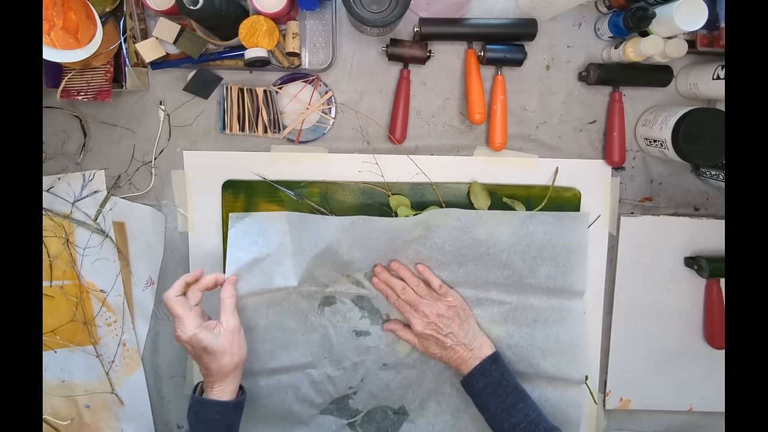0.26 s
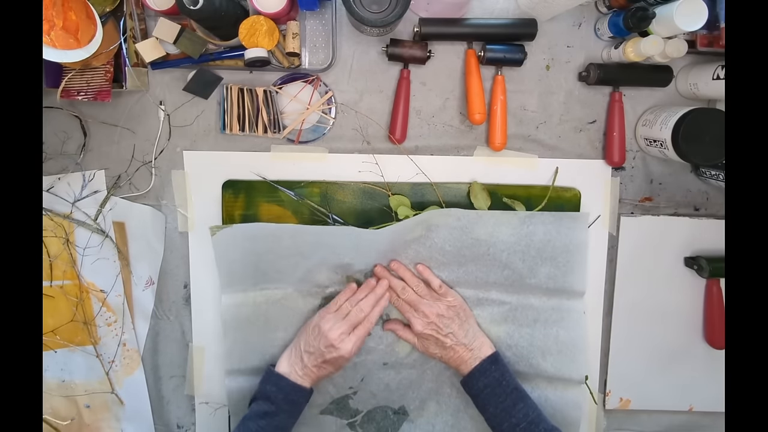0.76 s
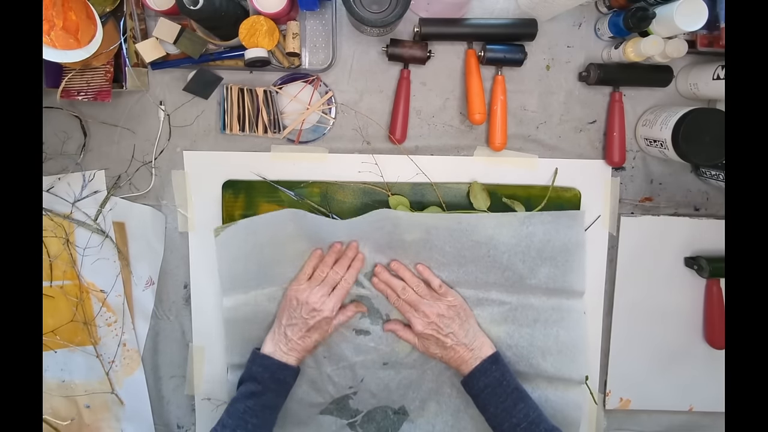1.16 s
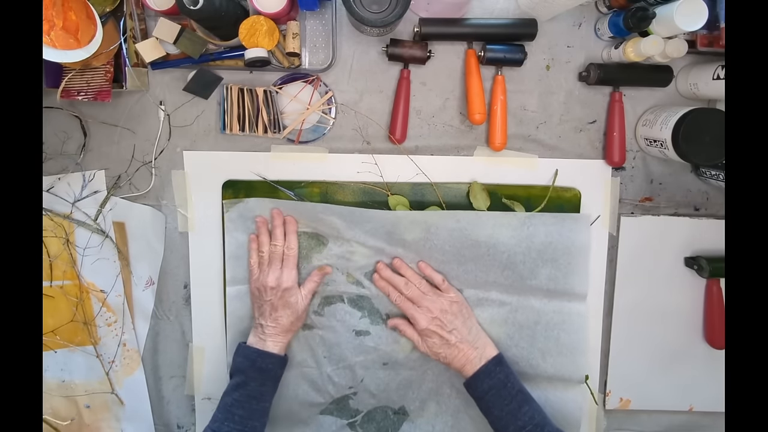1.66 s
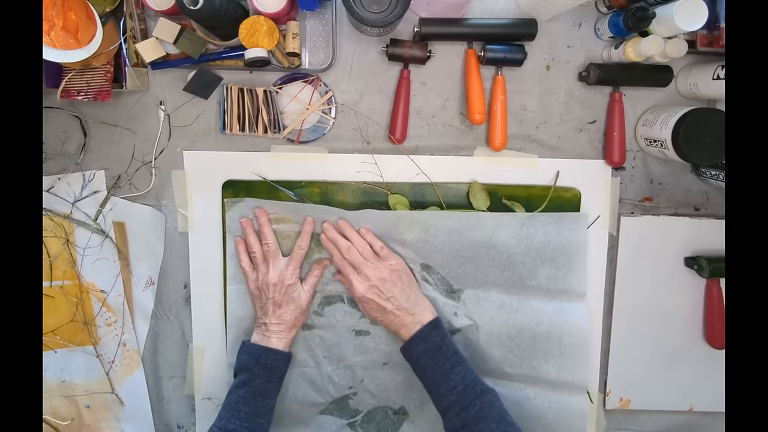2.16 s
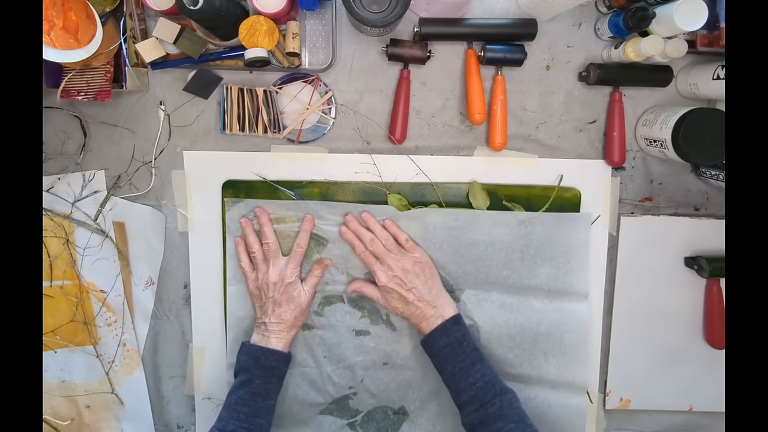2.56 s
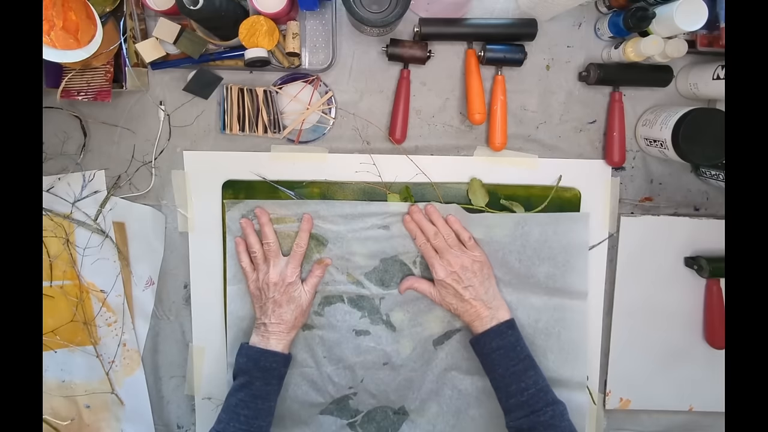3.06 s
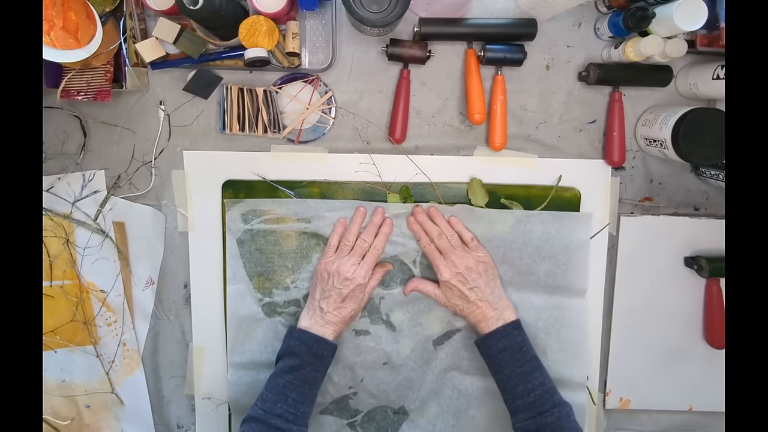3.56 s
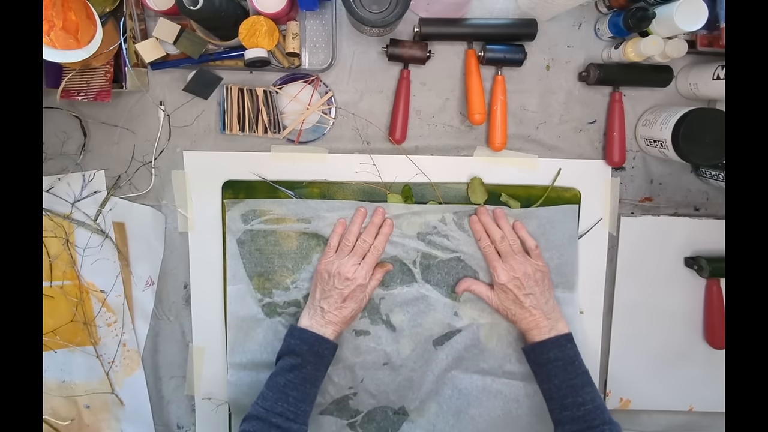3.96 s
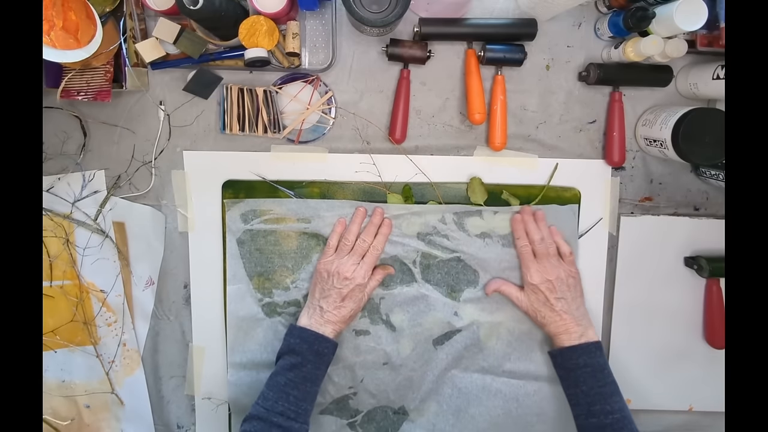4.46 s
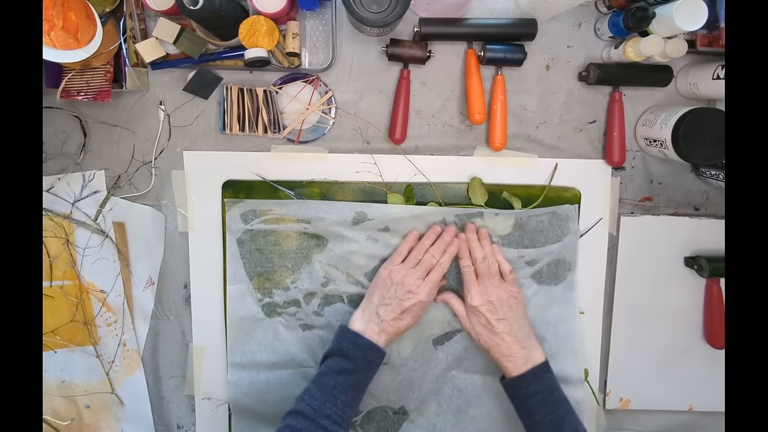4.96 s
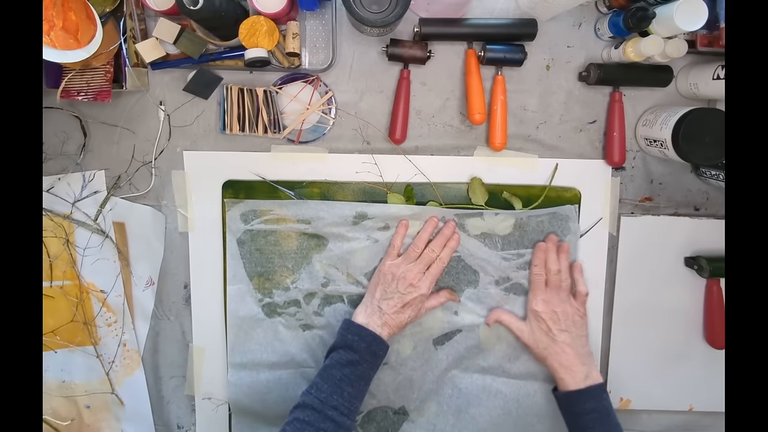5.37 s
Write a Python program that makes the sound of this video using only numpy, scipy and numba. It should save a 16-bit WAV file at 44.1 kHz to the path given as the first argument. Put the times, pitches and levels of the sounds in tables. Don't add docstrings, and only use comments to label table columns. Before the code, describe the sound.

Hands smooth thin tissue paper over a plate on a table, with crisp irregular rustling strokes, sharp crinkling snaps and a quiet room behind.

```python
import sys
import numpy as np
from scipy import signal
from scipy.fft import rfft, irfft
from scipy.io import wavfile
from scipy.ndimage import uniform_filter1d, minimum_filter1d
from numba import njit

SR = 44100
rng = np.random.default_rng(int(sys.argv[2]) if len(sys.argv) > 2 else 0)


def level_to_linear(level):
    exponent = np.asarray(level, float) / 20
    return 10 ** exponent


def pcm_store(signal):
    levels = np.round(np.clip(np.atleast_2d(signal), -1, 1) * 32767)
    wavfile.write(sys.argv[1], SR, levels.astype(np.int16).T)


N = 247842

# start in seconds, length in seconds, rustle at the start in dB,
# rustle at the end in dB, tautness in dB.
STROKES = [(.11, .05, -59, -47.5, -5), (.165, 0.048, -42, -33, -6), (0.247, 0.22, -44.5, -59, -7),
           (.855, .065, -62, -42, -2), (0.432, 0.18, -42, -46, -4), (0.906, .415, -42.5, -34, -2),
           (1.352, 0.48, -44.5, -43.5, 1), (1.842, 0.16, -47, -40, -4), (3.47, 0.045, -55, -55, -4),
           (2.207, 0.065, -37.5, -42, -1), (2.282, 0.059, -45.5, -39.5, -2), (2.35, 0.28, -38.5, -45, 0),
           (2.613, 0.5, -37.5, -36.5, 0), (3.138, 0.19, -43.5, -52, -1), (3.645, 0.214, -39.5, -35, -0.5),
           (3.874, 0.18, -40.5, -40, 0.5), (4.274, 0.21, -50.5, -41.5, 1), (4.426, 0.3, -38.5, -46, 1),
           (4.73, 0.11, -41.5, -38, 0), (4.905, 0.018, -37.5, -34.5, -1.5), (5.069, .18, -39, -37.5, 0),
           (5.22, .2, -38.5, -41, 0), (5.375, 0.097, -35, -39, -1)]
# time in seconds, rustle in dB, time to fade 10 dB in ms,
# tautness in dB.
CRUMPLES = [(.44, -40.5, 34, -2), (0.502, -31, 16, -1.5), (.585, -32.5, 0, 3.5), (0.932, -35.5, 29, -4.5),
            (4.19, -40.5, 24, -3), (4.53, -36.5, 73, 2), (4.925, -40, 15, 6), (1.048, -31, 36, -2),
            (1.2, -31, 36, -4), (1.281, -33.5, 130, -0.5), (1.44, -35, 57, 0), (2.207, -30, 9, -1.5),
            (2.41, -36, 66, -0.5), (2.69, -31.5, 63, -4), (3.66, -38, 63, -6), (3.85, -36.5, 56, 4),
            (3.961, -31.5, 14, -1.5), (4.818, -38.5, 34, -1), (4.993, -44, 5, 2.5), (5.51, -43, 25, -3),
            (1.95, -36, 11, 0), (2.27, -35.5, 15, -3), (5.563, -50, 8, -2),(5.46, -43, 34, 0)]
# start in seconds, rustle in dB, fall in dB per second.
SETTLES = [(0.032, -54.5, 157), (.6, -45.5, 254), (0.72, -58, 200), (0.86, -57.5, 90), (2.03, -53, 72),
           (3.32, -61.5, 84), (3.37, -48, 500), (4.085, -45, 300), (4.94, -52, 600), (4.86, -60, 200),
           (4.13, -58, 100), (0.218, -37.5, 310), (3.517, -37.5, 114), (4.18, -41.5, 120), (5.47, -38, 230)]
# frequency in Hz, gain in dB.
SHEET_COLOUR = [(200, -25), (450, -21), (900, -8.5), (1600, -7.5), (2100, -7), (2700, -1), (4200, -5.5),
                (5500, -4), (7400, -1), (9000, 2.5), (10000, -4), (11800, 7), (13300, 4), (15600, 3)]
# time in seconds, peak in dB, centre in Hz, avalanche length in ms.
SNAPS = [(.2114, -17, 13800, 1.0), (.4971, -13, 9300, .54), (.5034, -13, 12800, 1.9),
         (1.0448, -16, 8650, 1.9), (1.1799, -12.5, 14600, .9), (1.1997, -12, 12300, .54),
         (1.2232, -15, 3600, .8), (1.6837, -17, 13900, .6), (1.899, -19, 14200, .7),
         (1.9605, -15, 13000, .54), (1.9848, -25.5, 8060, 2.4), (2.2044, -23, 10000, 1.6),
         (2.3157, -12, 12200, .53), (2.3338, -15, 12000, .67), (2.6663, -18, 14100, .94),
         (2.6859, -9, 13760, .35), (2.6956, -28, 9200, 1.3), (2.7118, -2.5, 13800, .41),
         (2.7819, -11.5, 14050, 1.0), (2.8109, -3, 12500, .46), (2.9271, -13, 12200, .35),
         (2.9578, -11, 12900, .63), (3.07, -21, 13900, .33), (3.7858, -16, 11700, 1.0),
         (3.8532, -7, 11400, .39), (4.6691, -21.5, 8400, .41), (4.7416, -19.5, 8900, .54),
         (4.7793, -19.5, 4200, .67), (4.9015, -23, 8200, 1.4), (5.4591, -22.5, 3480, 2.1)]
# time in seconds, peak in dB, centre in Hz.
CRACKS = [(0.9323, -23, 10000), (1.0989, -28, 12700), (1.1303, -17, 10200), (1.2343, -17, 9000),
          (1.3263, -18, 8400), (1.3946, -17, 14200), (1.4352, -28, 13900), (1.9262, -24.5, 3600),
          (2.1993, -22, 11800), (2.2528, -20, 11800), (2.4003, -17.5, 7700), (2.4516, -14.5, 13500),
          (2.4823, -12.5, 11000), (2.5378, -22, 11300), (2.64, -17, 13800), (2.7296, -17, 12900),
          (2.7544, -17, 13200), (2.8547, -19, 7900), (3.0364, -13, 11400), (3.1088, -17, 15300),
          (3.521, -19.5, 8100), (3.6211, -21.5, 12400), (3.7055, -16.5, 12700), (4.0669, -20, 12500),
          (4.076, -20.5, 7900), (4.189, -31, 11100), (4.2245, -29, 7000), (4.9205, -27, 14600),
          (5.1176, -22, 8700), (5.279, -21, 13300)]
# time in seconds, peak in dB, centre in Hz.
TICKS = [(0.04, -37, 7860), (0.318, -23.5, 13900), (.3419, -33, 7500), (.4709, -23, 9450),
         (0.5577, -27, 9100), (0.6757, -26.5, 7140), (.727, -36.5, 2800), (0.804, -38.5, 7200),
         (0.8173, -24.5, 8800), (1.5928, -21.5, 8200), (1.7393, -22.5, 14000), (1.8626, -26, 6900),
         (2.0067, -22.5, 3280), (2.1434, -28, 9600), (2.1741, -43, 7500), (3.2, -27.5, 7800),
         (3.2618, -22.5, 8000), (3.2959, -22.5, 9050), (3.3735, -33, 8100), (3.4724, -35, 11300),
         (3.491, -29.5, 12300), (3.5682, -24, 9300), (3.5816, -22, 8100), (4.1159, -22, 13300),
         (4.1498, -28, 13700), (4.3213, -27, 13300), (4.88, -41, 7900), (4.956, -27, 9000),
         (4.9883, -31, 12500), (5.5608, -31.5, 7600)]
# time in seconds, peak in dB.
PATS = [(0.202, -48.5), (1.238, -44), (1.551, -54), (1.983, -48.5), (2.692, -44.5), (2.807, -41),
        (2.871, -50), (2.946, -53), (3.761, -59), (3.961, -48), (4.419, -65), (4.565, -53), (4.895, -52),
        (5.073, -53)]
# time in seconds, frequency in Hz, level in dB, half length in seconds.
TABLE_BOOMS = [(4.702, 145, -51.5, 0.033)]
# frequency in Hz, density in dB per Hz.
STUDIO_COLOUR = [(21, -21), (36, 2), (116, -1.5), (175, -13), (225, -22), (400, -19), (640, -27.5),
                 (900, -14), (1300, -14), (2500, -14), (5600, -25), (9000, -52), (10300, -35), (15000, -29)]
# time in seconds, level in dB, half length in seconds.
SWELLS = [
    (0.0, -68, .1),
    (1.253, -58, 0.13),
    (3.226, -61, 0.27),
    (3.572, -64, .06),
    (3.8, -63, .06),
    (4.96, -61, 0.029),
    (5.42, -63, .13),
]
# frequency in Hz, level in dB.
HUM = [(59.5, -73), (120, -72.5)]

ATTACK_DB_PER_S, RELEASE_DB_PER_S, STILL_DB = 1300, 1100, -74
USUAL_DB = -40
# dB at the usual rustle, dB per dB of rustle, dB per dB of tautness.
BODY_LAW, CRISP_LAW = (-12.5, -0.31, -0.23), (-3.5, 0.23, 2)
LIGHT_CLUMP, LIGHT_SKIN, LIGHT_FOLD = 0.15, 0.44, 0.15
FOLD_OVER_DB, FOLD_SCATTER_DB, FOLD_MS = 13.5, 4.5, 0.75
FOLD_LOW_HZ, FOLD_HIGH_HZ = 7000, 14200
TICK_MS = 0.75
ECHO_S, ECHO_SHARE = 20 / SR, 0.3
STUDIO_DB, HISS_DB = -60, -80
RUMBLE_DB, RUMBLE_WANDER_DB = -74.5, 2.5
TOP_HZ, PEAK_TOP_HZ, TOP_GATE_DB = 15800, 16900, -34


def hands():
    t = np.arange(N) / SR

    def rise(s):
        return ATTACK_DB_PER_S * np.maximum(s - t, 0)

    moves = [(STILL_DB + 0 * t, 0)]
    for s, length, start_db, end_db, taut in STROKES:
        slide_db = np.interp(t, [s, s + length], [start_db, end_db])
        release = RELEASE_DB_PER_S * np.maximum(t - s - length, 0)
        moves.append((slide_db - rise(s) - release, taut))
    with np.errstate(divide="ignore", invalid="ignore"):
        for s, db, fade_ms, taut in CRUMPLES:
            moves.append((db - 10 * np.abs(t - s) / (fade_ms / 1000), taut) if fade_ms else (STILL_DB + 0 * t, 0))
    for s, db, fall in SETTLES:
        moves.append((db - rise(s) - fall * np.maximum(t - s, 0), 0))
    levels = np.array([db for db, _ in moves])
    taut_db = np.array([taut for _, taut in moves], float)[levels.argmax(axis=0)]
    return levels.max(axis=0), uniform_filter1d(taut_db, size=600)


def paper(stroke_db, taut_db):
    body_db, crisp_db = (db + slope * (stroke_db - USUAL_DB) + pull * taut_db
                         for db, slope, pull in (BODY_LAW, CRISP_LAW))
    light_db = USUAL_DB - stroke_db
    clump_db = np.clip(2.73 + LIGHT_CLUMP * light_db, 0.5, 5)
    crinkle = rustle(count=14000, size=6, scatter_db=4.0, length_ms=0.5, ring_ms=0.25, clump_db=clump_db)
    skin = level_to_linear(-2.0 - LIGHT_SKIN * light_db) * band(rng.standard_normal(N), 90, 14700)
    body, middle, crisp = split(colour(crinkle + skin, SHEET_COLOUR), low_hz=1900, high_hz=8380)
    sheet = middle + level_to_linear(body_db + 12.5) * body + level_to_linear(crisp_db - 1.1) * crisp
    return level_to_linear(stroke_db - 3.5) * sheet / np.std(middle)


def rustle(count, size, scatter_db, length_ms, ring_ms, clump_db):
    when, luck, centre = rng.random((count, 3)).T[:, :, None]
    late, pitch, turn = np.moveaxis(rng.random((count, size, 3)), 2, 0)
    start = (when * N - np.log(1 - late) * length_ms / 1000 * SR).astype(np.int64)
    hz = 300 + 17000 * ((centre + 0.55 * pitch) % 1)
    strength = level_to_linear(np.minimum(-scatter_db * np.log(1 - luck), 12.5) + 0 * late)
    ring_s = np.full(start.size, ring_ms / 1000)
    grain = buckles(start.ravel(), hz.ravel(), ring_s, strength.ravel(), turn.ravel())
    return level(grain * level_to_linear(clump_db * walk(70)), 0)


@njit
def buckles(start, hz, ring_s, size, turn):
    out = np.zeros(N)
    for k in range(len(start)):
        step = np.exp(2j * np.pi * hz[k] / SR - 1 / (ring_s[k] * SR))
        z = size[k] * np.exp(2j * np.pi * turn[k])
        end = min(start[k] + int(6 * ring_s[k] * SR) + 2, N)
        for i in range(max(start[k], 0), end):
            out[i] += z.imag
            z *= step
    return out


def folds(stroke_db, count):
    when, luck, pitch, long = rng.random((count, 4)).T
    now_db = stroke_db[(when * N).astype(int)]
    over_db = FOLD_OVER_DB + FOLD_SCATTER_DB * (2 * luck - 1)
    peak_db = now_db + LIGHT_FOLD * (USUAL_DB - now_db) + over_db
    hz = FOLD_LOW_HZ + (FOLD_HIGH_HZ - FOLD_LOW_HZ) * np.sqrt(pitch)
    chance = np.transpose([when * N / SR, peak_db, hz, FOLD_MS * 2 ** (2 * long - 1)])
    return np.vstack([SNAPS, [(*tick, TICK_MS) for tick in [*TICKS, *CRACKS]], chance])


def snaps(rows, count, spread_hz, ring_ms, lead_db):
    s, peak_db, hz, length_ms = rows.T[:, :, None]
    late, pitch, turn = np.moveaxis(rng.random((len(rows), count, 3)), 2, 0)
    late[:, 0], pitch[:, 0] = 0.2, 0.5
    after = -np.log(1 - late) * np.clip(length_ms, 0.1, 8) / 1000
    tone = hz + spread_hz * np.tan(np.pi * 0.8 * (pitch - 0.5))
    tone = np.where((tone > 2000) & (tone < 16500), tone, 2000 + 14000 * turn)
    crowd_db = -9.0 + 10 * np.log10(length_ms / 0.7)
    size = level_to_linear(peak_db + np.where(np.arange(count) == 0, lead_db, crowd_db))
    start = ((s + after) * SR).astype(np.int64)
    ring_s = np.full(start.size, ring_ms / 1000)
    crack = buckles(start.ravel(), tone.ravel(), ring_s, size.ravel(), turn.ravel())
    return band(crack, 2300, 19000)


def pats(fade_s):
    t = np.arange(N) / SR
    shape = sum(level_to_linear(db - 12.0) * np.exp(-np.maximum(t - s, 0) / fade_s) * (t > s) for s, db in PATS)
    return shape * level(band(rng.standard_normal(N), 130, 1130), 0)


def table_and_room(x, tail_db, t60_s, scatter_db, scatter_s):
    t = np.arange(SR // 2) / SR
    answer = rng.standard_normal((2, len(t)))
    scatter = answer[0] * np.exp(-t / scatter_s) * (t > 0.001)
    tail = band(answer[1], 200, 12000) * 1000 ** (-t / t60_s) * (1 - np.exp(-t / 0.004))
    reply = level_to_linear(scatter_db) * scatter / np.linalg.norm(scatter)
    reply = reply + level_to_linear(tail_db) * tail / np.linalg.norm(tail)
    echo = band(np.interp(np.arange(N) - ECHO_S * SR, np.arange(N), x), 100, 12000)
    return x + ECHO_SHARE * echo + signal.fftconvolve(x, reply)[:N]


def studio():
    t = np.arange(N) / SR

    def swelling(s, db, half_s):
        return level_to_linear(db) * np.exp(-((t - s) / half_s) ** 2)

    low, air, _ = split(colour(rng.standard_normal(N), STUDIO_COLOUR), low_hz=95, high_hz=40000)
    scale = level_to_linear(STUDIO_DB) / np.std(low + air)
    swell = sum(swelling(*row) for row in SWELLS)
    rumble = level(low, -2.8) * (level_to_linear(RUMBLE_DB + RUMBLE_WANDER_DB * walk(5)) + swell)
    hum = sum(level_to_linear(db + 2 * walk(12)) * np.sqrt(2) * np.sin(2 * np.pi * hz * t) for hz, db in HUM)
    boom = sum(swelling(s, db, half_s) * np.sin(2 * np.pi * hz * t) for s, hz, db, half_s in TABLE_BOOMS)
    hiss = level(band(rng.standard_normal(N), 3000, 21000), HISS_DB)
    return scale * air + rumble + hum + boom + hiss


def level(x, db):
    return x * level_to_linear(db) / np.sqrt(np.mean(x ** 2))


def colour(x, points):
    hz, db = np.transpose(points)
    grid = np.arange(1, 4098) * SR / 8194
    cep = irfft(np.log(level_to_linear(np.interp(np.log(grid), np.log(hz), db))))
    cep[1:len(cep) // 2] *= 2
    cep[len(cep) // 2 + 1:] = 0
    return signal.fftconvolve(x, irfft(np.exp(rfft(cep)))[:4096])[:N]


def band(x, lo_hz, hi_hz):
    sos = signal.butter(2, [lo_hz, min(hi_hz, 0.45 * SR)], "band", fs=SR, output="sos")
    return signal.sosfilt(sos, x)


def split(x, low_hz, high_hz):
    hz, whole = np.arange(N // 2 + 1) * SR / N, rfft(x)
    low = 1 / (1 + (hz / low_hz) ** 4)
    high = 1 - 1 / (1 + (hz / high_hz) ** 8)
    return (irfft(whole * share, N) for share in (low, 1 - low - high, high))


def walk(rate):
    hold = max(int(SR / rate), 2)
    steps = np.repeat(rng.standard_normal(N)[:N // hold + 1], hold)
    return 1.2 * uniform_filter1d(steps, hold)[:N]


def scene():
    stroke_db, taut_db = hands()
    rubbing = paper(stroke_db, taut_db)
    cracks = snaps(folds(stroke_db, count=170), count=24, spread_hz=2200, ring_ms=0.15, lead_db=-2.5)
    sheet = rubbing + cracks + pats(fade_s=0.02)
    heard = table_and_room(sheet, tail_db=-16, t60_s=0.15, scatter_db=-15, scatter_s=0.003)
    return (heard + studio())[None]


def roll_off(x):
    return signal.sosfilt(signal.butter(12, 17150, fs=SR, output="sos"), x)


def record(dry):
    x = signal.sosfilt(signal.butter(6, 39, "high", fs=SR, output="sos"), dry)
    hz, whole = np.arange(N // 2 + 1) * SR / N, rfft(x)
    main = irfft(whole * (hz < TOP_HZ), N)
    top = irfft(whole * (hz >= TOP_HZ) * (hz < PEAK_TOP_HZ), N)
    sharp = uniform_filter1d(top ** 2, size=64) > level_to_linear(2 * TOP_GATE_DB)
    gate = uniform_filter1d(1 - minimum_filter1d(1.0 - sharp, size=400), size=150)
    return roll_off(main + gate * top)


dry = scene()
out = record(dry)
pcm_store(out)
```